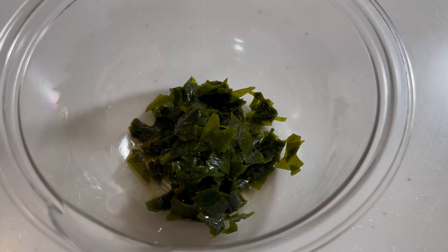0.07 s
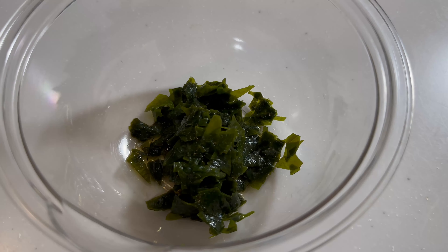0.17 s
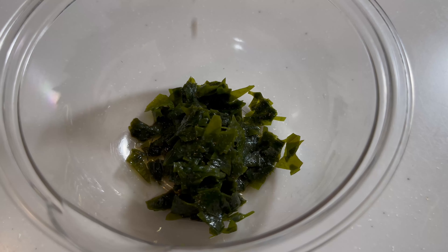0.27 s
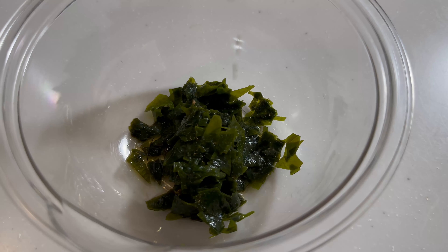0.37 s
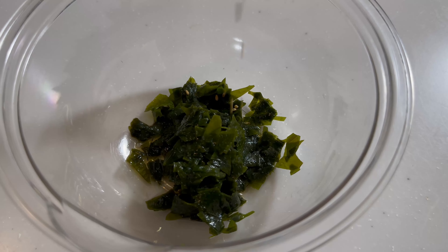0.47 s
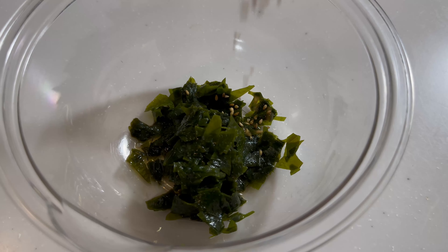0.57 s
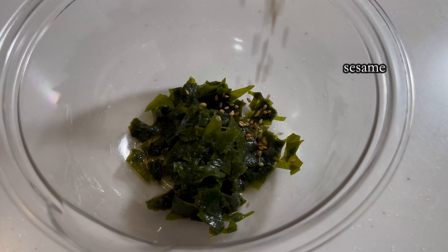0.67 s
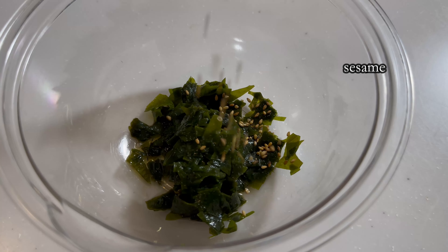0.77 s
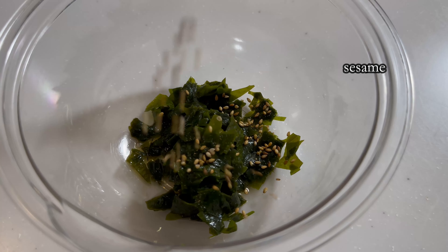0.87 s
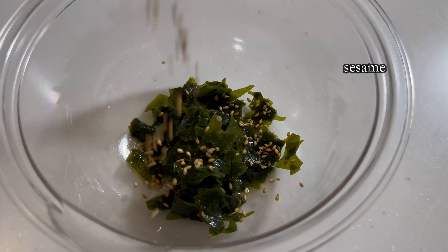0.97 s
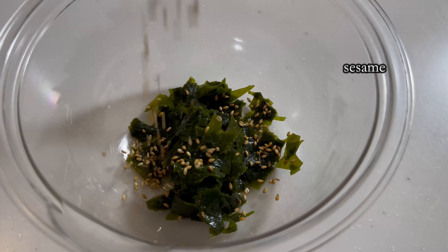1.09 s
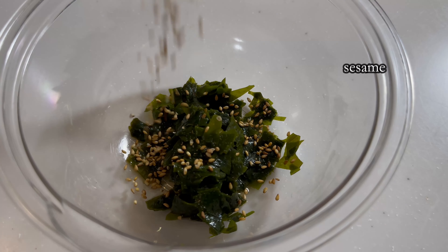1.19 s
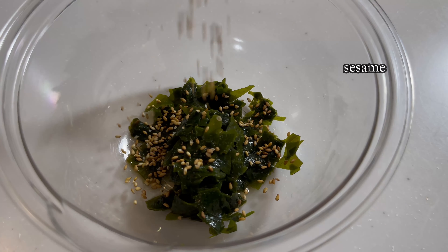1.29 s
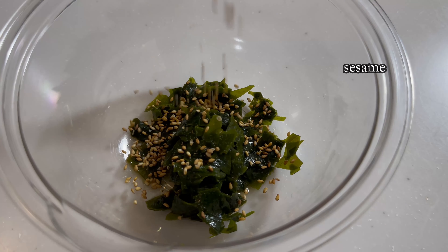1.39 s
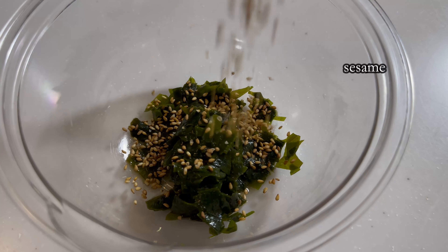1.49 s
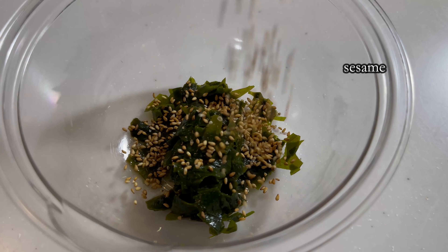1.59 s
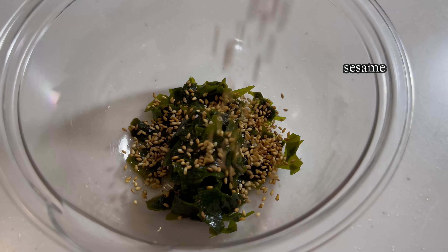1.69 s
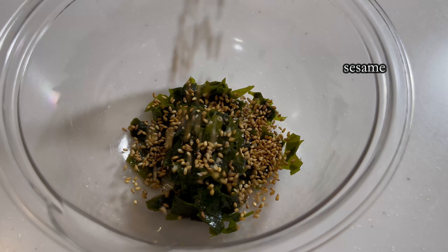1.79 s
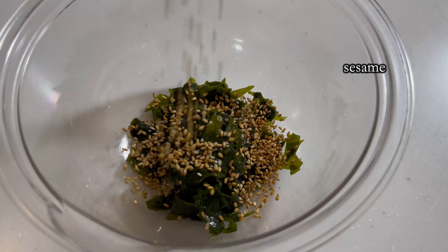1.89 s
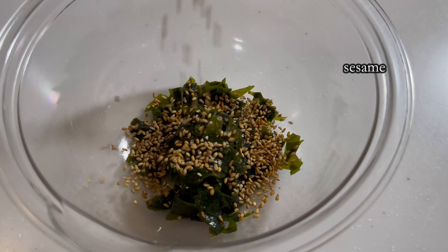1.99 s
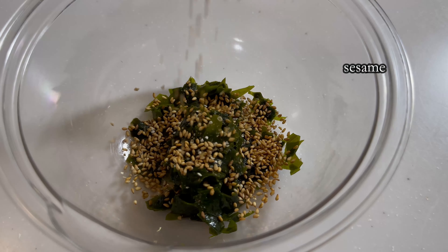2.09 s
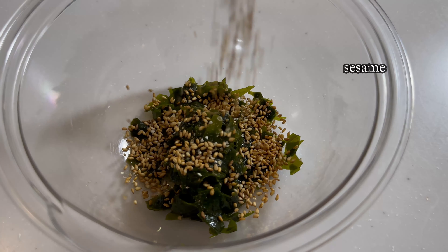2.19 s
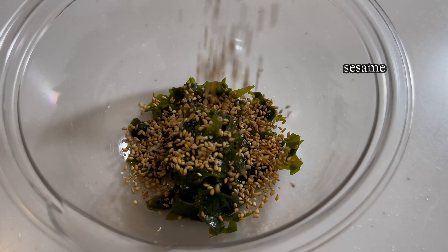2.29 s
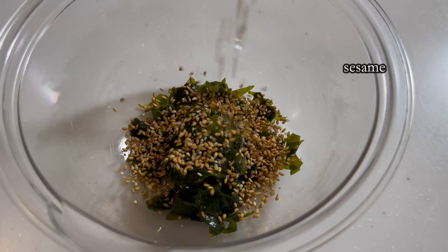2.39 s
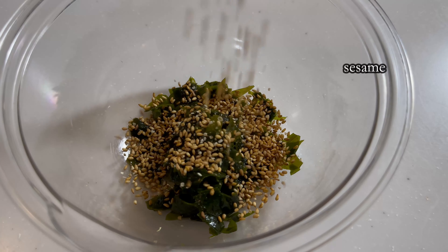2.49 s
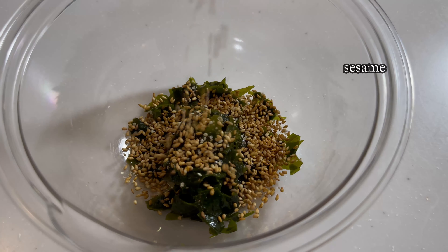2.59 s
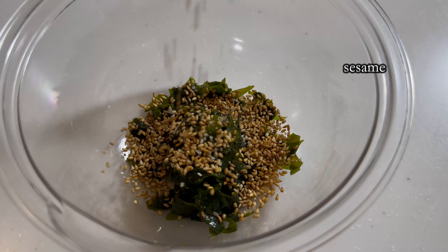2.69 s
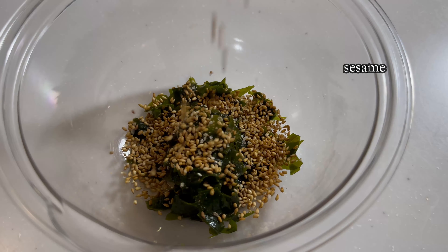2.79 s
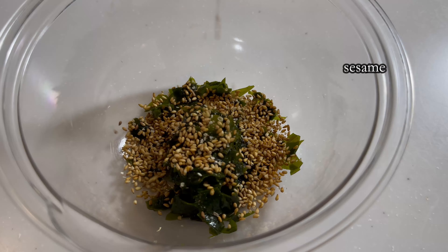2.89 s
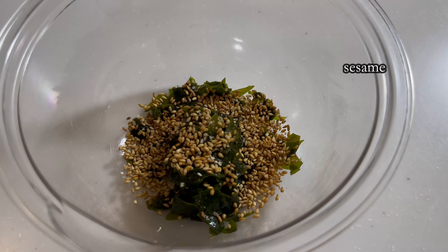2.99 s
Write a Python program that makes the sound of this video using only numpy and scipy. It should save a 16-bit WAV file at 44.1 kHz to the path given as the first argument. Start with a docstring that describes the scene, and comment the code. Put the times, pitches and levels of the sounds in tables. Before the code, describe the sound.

Sesame seeds being tapped out onto wet seaweed in a glass bowl, heard close in a small live room. Low hum and air, a faint tick at 0.07 s, a soft puff at 0.15 s. From 0.24 to 2.66 s, seventeen low, knocking taps, about every 0.15 s, slightly left, with seed rattle. Fine bright patter grows from 0.5 s, surges unevenly around 1.0, 1.5, 1.85 and 2.4 s, then thins to last ticks near 2.95 s.

```python
"""A low appliance hum and room air come first, then a tick, a soft puff and a run of taps, a little to the left.
Toasted sesame seeds are tapped out of their container onto wet seaweed in a glass bowl, in a small live room.
Each tap adds noise bursts (crack, snap), damped modes (knock) and a falling sweep (thump); the seeds inside rattle.
The falling seeds are random clicks and short rings that patter and tick in the bowl and thin out at the end.
A decaying noise tail makes the room; width and treble vary with frequency, and nothing sounds above 16.2 kHz."""
import sys
import numpy as np
from scipy import signal
from scipy.fft import rfft, irfft, next_fast_len
from scipy.io import wavfile
from scipy.ndimage import map_coordinates

SR = 44100
rng = np.random.default_rng(int(sys.argv[2]) if len(sys.argv) > 2 else 0)


def master_out(mix):
    """Clip the mix to full scale and print it as 16-bit PCM to the path in sys.argv[1]."""
    frames = np.transpose(np.atleast_2d(mix))
    ceiling = np.clip(frames, -1, 1)
    pcm = np.round(ceiling * 32767).astype(np.int16)
    wavfile.write(sys.argv[1], SR, pcm)


N = 134505
AGE = np.arange(SR // 4) / SR  # seconds since a sound began
PAIR = np.array([[1], [-1]])  # left, right

# Taps on the container. Each row: time in seconds, thump level in relative dB, thump decay scale in seconds,
# knock pitch in Hz, then knock, crack, snap and seed rattle levels in relative dB.
TAPS = [(0.2424, -26.5, 0.0057, 1310, -36, -36, -35.5, -41),
        (0.3821, -22.5, 0.0083, 1280, -38.5, -30.5, -40, -39),
        (0.5417, -27, 0.028, 1060, -43.5, -42, -44.5, -44),
        (0.6857, -26.5, 0.17, 1026, -42.5, -41.5, -45, -39.5),
        (0.8453, -27.5, 0.0067, 1182, -40, -37.5, -33.5, -46),
        (0.9905, -29, 0.004, 1140, -41, -36, -36.5, -47.5), (1.1395, -31, 0.0041, 1170, -41, -40, -41, -41),
        (1.2857, -26.5, 0.0052, 1095, -32, -32.5, -32.5, -36.5),
        (1.4463, -29, 0.0075, 1023, -39.5, -60, -52.5, -41.5),
        (1.589, -28, 0.022, 886, -51.5, -42, -48, -43.5),
        (1.7557, -34, 0.0038, 1110, -49, -47, -45.5, -47.5),
        (1.896, -28, 0.0055, 1085, -38.5, -41, -49, -44),
        (2.043, -26.5, 0.0034, 1187, -35.5, -32, -30.5, -39),
        (2.2082, -34.5, 0.039, 1040, -54, -47.5, -60, -46.5),
        (2.342, -28.5, 0.012, 1060, -45, -47, -53, -40.5),
        (2.502, -28, 0.0081, 1087, -38.5, -39.5, -46.5, -44),
        (2.664, -35, 0.051, 1060, -54, -58, -48, -47.5)]
SWEEP_CYCLES = 1.485  # thump pitch in Hz = SWEEP_CYCLES / age in seconds
SWEEP_LEAD_S, THUMP_RISE_S, THUMP_TRIM_DB = 0.00059, 0.002945, 0.5
THUMP_FADE = 1.12  # nepers at one decay scale
RIGHT_STRETCH = 0.092  # the right side's clock is stretched by this fraction
# Colour of the thump. Each row: frequency in Hz, gain in dB.
THUMP_COLOUR = [(35, -22.5), (75, 0.5), (260, 0.5), (420, -2), (650, -8.5), (1500, 1.5)]
# Modes of the container. Each row: multiple of the knock pitch, relative level in dB, 60 dB decay in seconds.
KNOCK_MODES = [(1, 5.5, 0.0096), (1.25, -12, 0.015), (1.901, -3, 0.0064), (2.9, -9, .011)]
KNOCK_TRIM_DB, KNOCK_RISE_S = 5.5, 0.0012
# Colour of the crack. Each row: frequency in Hz, gain in dB.
CRACK_COLOUR = [(300, -77), (800, 2.5), (1400, -4), (2000, 1), (3400, -3.5), (5000, -9), (7000, -20.5),
                (16000, -18)]
# Colour of the brighter snap. Each row: frequency in Hz, gain in dB.
SNAP_COLOUR = [(1500, -34), (4000, -4.5), (7000, -7.5), (11000, -6), (16000, -22)]
CRACK_PEAK_S, SNAP_PEAK_S, CLICK_DELAY_S = 0.0009414, 0.0005, 0.00046
CRACK_TRIM_DB, SNAP_TRIM_DB = -0.5, -0.5
TAP_PAN_DB, THUMP_PAN_DB = 6.5, 1.0  # left above right

# Colour of the seeds rattling inside. Each row: frequency in Hz, gain in dB.
RATTLE_COLOUR = [(1000, -4.5), (2500, -5.5), (4500, -6), (7000, -8), (11000, -6.5), (16000, -6)]
RATTLE_PEAK_S, RATTLE_SHARPNESS, RATTLE_TRIM_DB, RATTLE_PER_S = 0.012, 0.63, 1, 3100

# Clumps of seeds landing. Each row: time in seconds, nominal peak of the top in dB,
# level of the 3-6 kHz body in dB.
TICKS = [(0.0654, -41, -58), (0.605, -38, -42.5), (0.8247, -37, -45.5), (1.232, -34, -49),
         (1.2511, -44, -40), (1.4924, -47, -37), (1.512, -29, -44), (1.534, -30.5, -43.5),
         (1.6483, -30, -43.5), (1.6583, -28, -42), (1.7412, -33, -50), (1.812, -29.5, -45),
         (1.83, -30, -42), (1.8466, -25.5, -43), (2.087, -25, -43.5), (2.1101, -28, -56),
         (2.1781, -29, -40.5), (2.3005, -35, -52), (2.4309, -36, -47), (2.758, -37, -64),
         (2.776, -29, -44.5), (2.7973, -32, -44), (2.8142, -35, -45.5), (2.8973, -39.5, -51.5),
         (2.9524, -37.5, -52)]
TICK_BODY_PEAK_S, TICK_TOP_PEAK_S, TICK_CREST_DB = 0.0011, 0.0007, 11
# Colour of the dull landings. Each row: frequency in Hz, gain in dB.
BODY_COLOUR = [(1200, -33.5), (2300, -11), (3200, -4), (4200, -1), (6000, -7.5), (9000, -9.5), (16000, -42)]
# Colour of the bright landings. Each row: frequency in Hz, gain in dB.
TOP_COLOUR = [(2000, -36.5), (5000, -15.5), (8500, 0), (11500, 0.5), (16000, -2.5)]
# Flow of seeds into the bowl. Each row: time in seconds, patter level in relative dB.
FLOW = [(.2, -91), (.45, -60), (0.559, -51), (.8, -57.5), (.95, -43.5), (1.08, -43), (1.22, -48.5),
        (1.4, -45.5), (1.52, -43), (1.72, -52.5), (1.851, -40.5), (2.0, -46.5), (2.25, -46.5),
        (2.42, -42.5), (2.58, -49.5), (2.8, -49.5), (2.899, -58), (3.05, -61.5)]
DULL_PER_S, BRIGHT_PER_S, SEED_SCATTER_DB = 750, 1000, 5.5
CLUMP_DB, CLUMPS_PER_S = 2.8, 80  # depth and knot rate of the uneven flow
SEED_CLICK_S, PLINK_S, PLINK_HZ = 0.0004, 0.0013, (2400, 6600)
PATTER_BODY_TRIM_DB, PATTER_TOP_TRIM_DB, BODY_PAN_DB = -8.5, -4.5, 2.6

# Colour of the puff. Each row: frequency in Hz, gain in dB.
PUFF_COLOUR = [(700, 2.5), (1800, 5), (3500, -1), (7000, -2), (11000, -3.5), (16000, -10)]
PUFF_START_S, PUFF_DB, PUFF_RISE_S, PUFF_FADE_S = 0.1547, -42.5, 0.0046, 0.032

# Decay of the room. Each row: frequency in Hz, 60 dB decay in seconds.
ROOM_T60 = [(100, 0.033), (500, 0.57), (3000, 0.47), (10000, 0.25), (16000, 0.088)]
# Colour of the room. Each row: frequency in Hz, gain in dB.
ROOM_COLOUR = [(60, -14), (300, -12), (750, -9), (1500, -2), (2500, -1), (11000, 0), (16000, -2)]
ROOM_DELAY_S, ROOM_RISE_S, TAP_WET_DB, SEED_WET_DB = 0.0006, 0.00043, 1, -6

# Tones of the appliance hum. Each row: frequency in Hz, middle level in dB.
HUM = [(32.3, -63), (64.6, -60.5), (96.9, -59.5), (129.2, -57)]
# Colour of the room air. Each row: frequency in Hz, relative gain in dB.
AIR_COLOUR = [(20, -8), (60, -10), (125, -3), (190, -14), (300, -10.5), (420, -15), (800, -23.5),
              (6500, -52), (16000, -43)]
AIR_DB = -54

# Stereo width by frequency, narrowest near 11 kHz. Each row: frequency in Hz, side against centre in dB.
WIDTH = [(1200, -1), (3000, 1.5), (8000, 3.5), (11000, -9.5), (14000, 1)]
# Treble response of the microphone. Each row: frequency in Hz, gain in dB.
MICROPHONE = [(6600, -1), (7600, -6.5), (9200, -4.5), (10800, 3), (16000, -5.5)]
TOP_HZ = 16200  # nothing sounds above this
LEVEL_WINDOW_S = 0.005  # reference length for the level of a short sound


def taps():
    """Every tap thumps, knocks and cracks: the direct sound, and the even spread of it that reaches the walls."""
    low, high, spread = np.zeros((3, 2, N))
    impulse = 1.0 * (AGE == 0)
    plain_crack = blow(colour(impulse, CRACK_COLOUR))
    plain_snap = blow(colour(impulse, SNAP_COLOUR))
    for s, thump_db, decay_s, hz, knock_db, crack_db, snap_db, _ in TAPS:
        thump_gain, knock_gain = amp(thump_db + THUMP_TRIM_DB), amp(knock_db + KNOCK_TRIM_DB)
        crack_gain, snap_gain = amp(crack_db + CRACK_TRIM_DB), amp(snap_db + SNAP_TRIM_DB)
        body = knock_gain * knock(hz, min(crack_db - knock_db, 0))
        add(low, s - SWEEP_LEAD_S, thump_gain * thump(decay_s))
        add(high, s, body)
        # both bursts peak at the same moment
        click_s = s + CLICK_DELAY_S
        add(high, click_s - CRACK_PEAK_S, crack_gain * burst(CRACK_PEAK_S, CRACK_COLOUR, apart=1.0))
        add(high, click_s - SNAP_PEAK_S, snap_gain * burst(SNAP_PEAK_S, SNAP_COLOUR, apart=0.26))
        add(spread, s, 0.5 * body + crack_gain * plain_crack + snap_gain * plain_snap)
    direct = low * amp(PAIR * THUMP_PAN_DB / 2) + high * amp(PAIR * TAP_PAN_DB / 2)
    return direct, low + spread


def thump(decay_s):
    """A bending wave: the lows arrive after the highs, so the pitch falls as one over the age."""
    # the stretched right side swells later and fades slower, with the sweep shifted in phase
    age = (AGE + 1 / SR) / np.array([[1], [1 + RIGHT_STRETCH]])
    swell = 1 - np.exp(-(age / THUMP_RISE_S) ** 15.0)
    fade = np.exp(-THUMP_FADE * (age / decay_s) ** 0.73)
    sweep = np.cos(2 * np.pi * SWEEP_CYCLES * np.log(age / THUMP_RISE_S))
    return blow(colour(swell * fade * sweep, THUMP_COLOUR))


def knock(hz, hard_db):
    """The container's damped modes; a harder tap brings out the upper ones, in a new balance each time."""
    modes = np.zeros(len(AGE))
    for ratio, db, t60 in KNOCK_MODES:
        balance_db = (ratio > 1) * (hard_db + rng.normal(0, 4.5))
        modes += amp(db + balance_db - 60 * AGE / t60) * np.sin(2 * np.pi * hz * ratio * AGE)
    return blow(modes * (1 - np.exp(-AGE / KNOCK_RISE_S)))


def burst(peak_s, spectrum, apart):
    """A spray of tiny contacts that swells and dies fast; apart sets how much the two sides differ."""
    u = AGE[:SR // 32] / peak_s
    centre, side = rng.standard_normal((2, len(u)))
    noise = centre + apart * PAIR * side
    return blow(colour(noise * u * np.exp(-u), spectrum))


def rattle():
    """The seeds jump in the container at each tap and fall back."""
    level, u = np.zeros(N), AGE / RATTLE_PEAK_S
    jump = (u * np.exp(1 - u)) ** RATTLE_SHARPNESS
    for s, *_, rattle_db in TAPS:
        add(level, s, amp(rattle_db + RATTLE_TRIM_DB) * jump)
    return level * grains(RATTLE_PER_S, SEED_SCATTER_DB, clicks(SEED_CLICK_S), RATTLE_COLOUR, apart=1.0)


def landing():
    """An uneven patter of dull and bright seed impacts in the bowl, with clumps that tick out of it."""
    flow_db = np.interp(np.arange(N) / SR, *np.transpose(FLOW)) + CLUMP_DB * wobble(CLUMPS_PER_S)
    dull = grains(DULL_PER_S, SEED_SCATTER_DB, plinks(PLINK_S), BODY_COLOUR, apart=1.0)
    bright = grains(BRIGHT_PER_S, SEED_SCATTER_DB, clicks(SEED_CLICK_S), TOP_COLOUR, apart=1.0)
    body = amp(flow_db + PATTER_BODY_TRIM_DB) * dull
    top = amp(flow_db + PATTER_TOP_TRIM_DB) * bright
    for s, top_db, body_db in TICKS:
        add(body, s, amp(body_db) * burst(TICK_BODY_PEAK_S, BODY_COLOUR, apart=0.63))
        add(top, s, amp(top_db - TICK_CREST_DB) * burst(TICK_TOP_PEAK_S, TOP_COLOUR, apart=0.29))
    return top + body * amp(PAIR * BODY_PAN_DB / 2)


def puff():
    """A short soft puff of noise with a sharp start: dense small clicks that swell fast and fade."""
    level = np.zeros(N)
    add(level, PUFF_START_S, (1 - np.exp(-AGE / PUFF_RISE_S)) * np.exp(-AGE / PUFF_FADE_S))
    return amp(PUFF_DB) * level * grains(9800, 2.2, clicks(SEED_CLICK_S), PUFF_COLOUR, apart=1.0)


def grains(per_s, scatter_db, shapes, spectrum, apart):
    """Single small impacts drawn from a stock, each with its own time, size and place, rms 1."""
    chance, pick = rng.random((2, N))
    size, place = rng.standard_normal((2, N))
    at = np.flatnonzero(chance < per_s / SR)
    impacts = shapes[(pick[at] * len(shapes)).astype(int)]
    gain = amp(scatter_db * np.minimum(np.abs(size[at]), 2))
    side_gains = gain * (1 + apart * PAIR * np.tanh(place[at]))
    where = (at[:, None] + np.arange(shapes.shape[1])).ravel()
    # sum overlapping impacts sample by sample
    sides = [np.bincount(where, (impacts * g[:, None]).ravel(), N)[:N] for g in side_gains]
    return unit(colour(np.array(sides), spectrum))


def clicks(decay_s):
    """A stock of dry clicks, each a decaying noise burst, no two alike."""
    t = AGE[:SR // 256]
    return rng.standard_normal((SR // 32, len(t))) * np.exp(-t / decay_s)


def plinks(decay_s):
    """A stock of seed impacts on the wet leaves, each ringing briefly at its own pitch."""
    t = AGE[:SR // 128]
    hz = rng.uniform(*PLINK_HZ, (SR // 32, 1))
    return np.sin(2 * np.pi * hz * t) * np.exp(-t / decay_s)


def room(x):
    """The room's answer: noise dying at its own rate in each band, with a new tail for each short stretch."""
    out, step = np.zeros((2, N)), SR // 6
    for i in range(0, N, step):
        hz, t, z = signal.stft(rng.standard_normal((2, SR // 2)), SR, nperseg=256)
        decay = amp(-60 * t / along(ROOM_T60, hz)[:, None])
        tail = signal.istft(z * decay, SR, nperseg=256)[1]
        late = np.maximum(np.arange(tail.shape[1]) / SR - ROOM_DELAY_S, 0)
        tail *= 1 - np.exp(-late / ROOM_RISE_S)
        add(out, i / SR, signal.fftconvolve(x[:, i:i + step], tail / np.linalg.norm(tail[0]), axes=1))
    return colour(out, ROOM_COLOUR)


def background():
    """A low appliance hum of sines that waver in level and phase, and the air of the room as coloured noise."""
    t = np.arange(N) / SR
    hum = np.zeros(N)
    for hz, db in HUM:
        level = amp(db + 1.65 * wobble(5.89)) * np.sqrt(2)  # rms to peak
        hum += level * np.sin(2 * np.pi * hz * t + 1.7 * wobble(4.49))
    mid, side = colour(rng.standard_normal((2, N)), AIR_COLOUR)
    return hum + amp(AIR_DB) * unit(mid + 0.88 * PAIR * side)


def amp(db):
    """Decibels to gain."""
    return 10 ** (np.asarray(db) / 20)


def unit(x):
    """Scale to rms 1."""
    return x / np.sqrt(np.mean(x ** 2) + 1e-20)


def blow(x):
    """Scale a short sound to the energy of rms 1 over the level window."""
    energy = np.mean(np.sum(x ** 2, axis=-1))
    return x * np.sqrt(LEVEL_WINDOW_S * SR / (energy + 1e-20))


def along(points, hz):
    """Read (Hz, value) points on a log frequency axis."""
    f, v = np.transpose(points)
    return np.interp(np.log(hz + 1), np.log(f + 1), v)


def wobble(rate):
    """A smooth random curve, rate knots a second."""
    knots = rng.standard_normal(int(N * rate / SR) + 4)
    return map_coordinates(knots, [np.arange(N) * rate / SR])


def add(track, s, x):
    """Mix x into the track from time s in seconds."""
    i = max(round(s * SR), 0)
    part = track[..., i:i + x.shape[-1]]
    part += x[..., :part.shape[-1]]


def colour(x, points):
    """Causal minimum-phase filter with the given (Hz, dB) shape."""
    n = x.shape[-1]
    m = 2 * next_fast_len(n // 2 + 1024)
    # fold the cepstrum onto positive time
    cepstrum = irfft(np.log(amp(along(points, np.fft.rfftfreq(m, 1 / SR)))), m)
    cepstrum[1:m // 2] *= 2
    cepstrum[m // 2 + 1:] = 0
    return irfft(rfft(x, m) * np.exp(rfft(cepstrum)), m)[..., :n]


def scene():
    """Container and bowl in the small room, with taps and dull patter a little left, over the background."""
    container, spread = taps()
    soft = landing() + rattle() + puff()
    reverb = room(amp(TAP_WET_DB) * spread + amp(SEED_WET_DB) * soft)
    return container + soft + reverb + background()


def record(dry):
    """Stereo width varies with frequency, the microphone shapes the treble, and the top is cut off at TOP_HZ."""
    centre = dry.mean(axis=0)
    side = colour((dry[0] - dry[1]) / 2, WIDTH)
    heard = colour(centre + PAIR * side, MICROPHONE)
    m = next_fast_len(N + SR // 2)
    below_top = np.fft.rfftfreq(m, 1 / SR) < TOP_HZ
    return irfft(rfft(heard, m) * below_top, m)[:, :N]


dry = scene()
out = record(dry)
master_out(out)
```